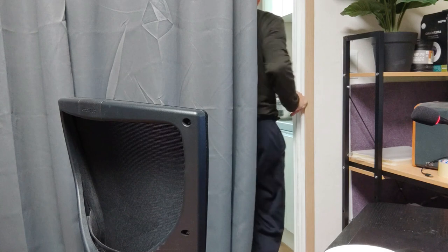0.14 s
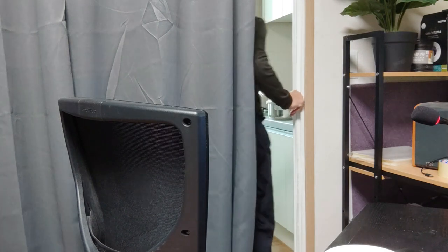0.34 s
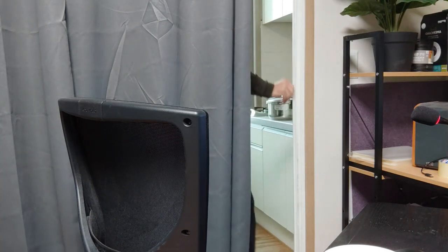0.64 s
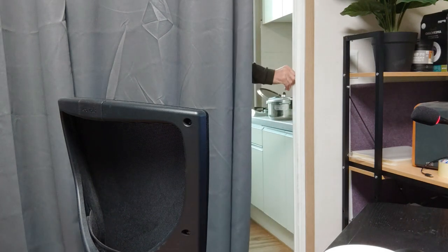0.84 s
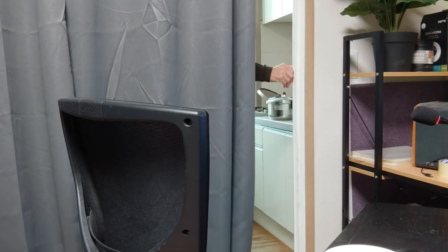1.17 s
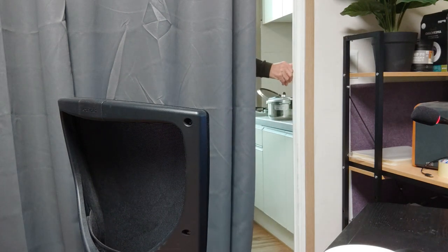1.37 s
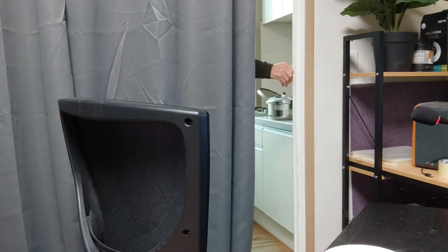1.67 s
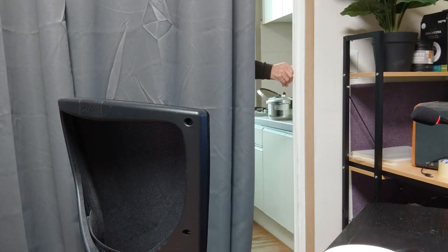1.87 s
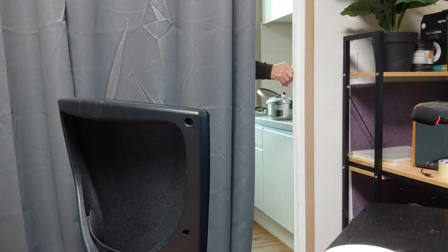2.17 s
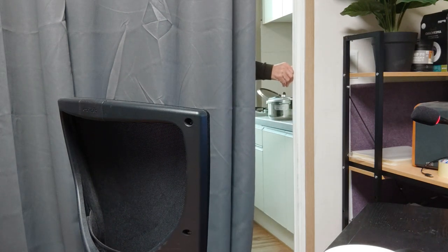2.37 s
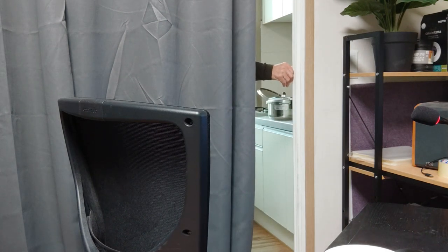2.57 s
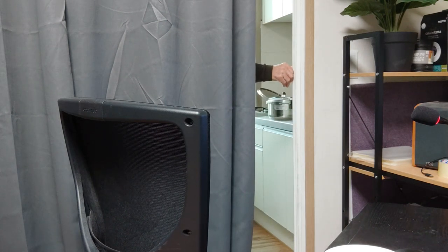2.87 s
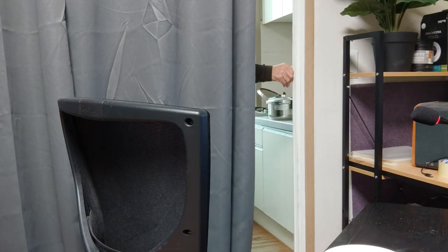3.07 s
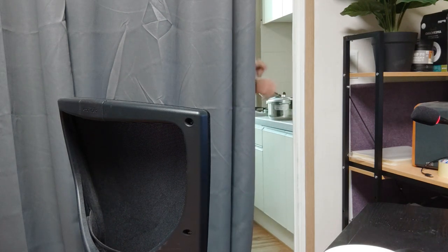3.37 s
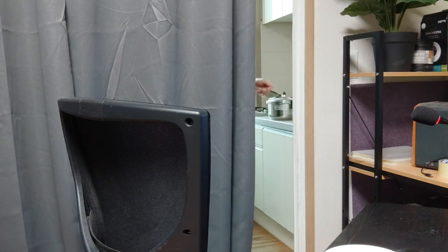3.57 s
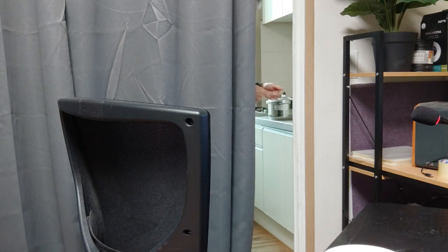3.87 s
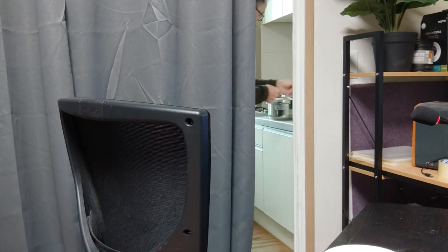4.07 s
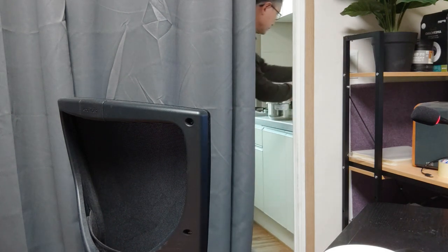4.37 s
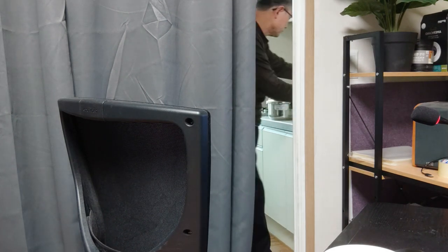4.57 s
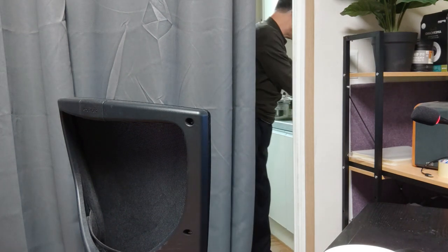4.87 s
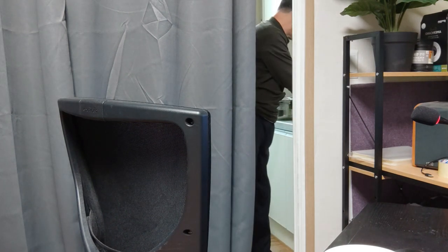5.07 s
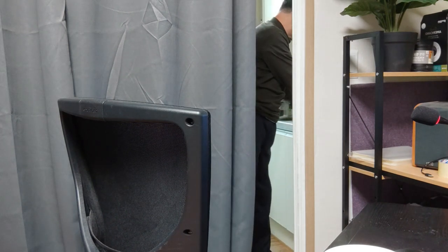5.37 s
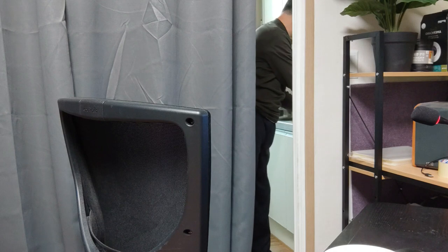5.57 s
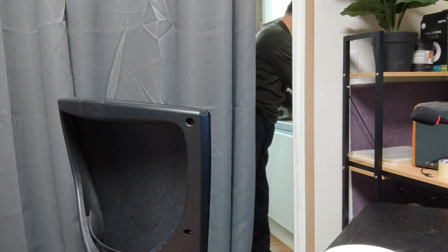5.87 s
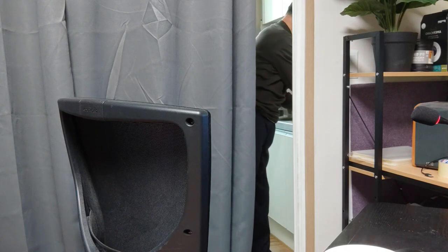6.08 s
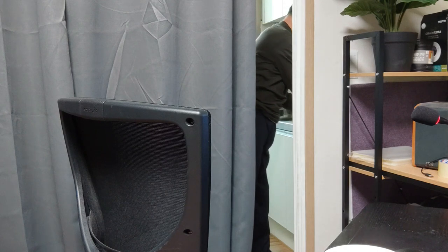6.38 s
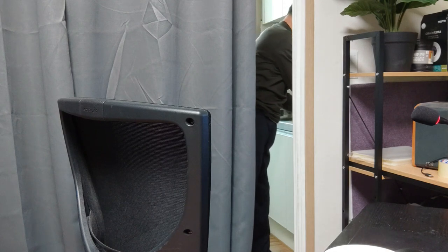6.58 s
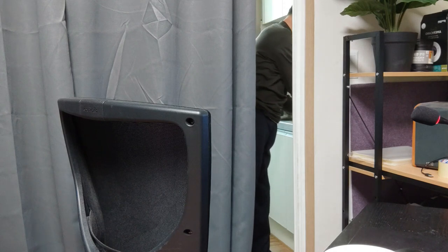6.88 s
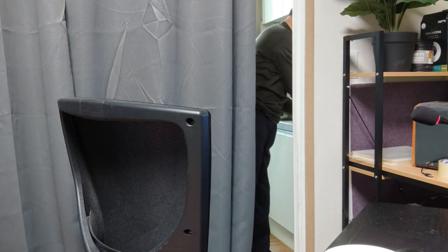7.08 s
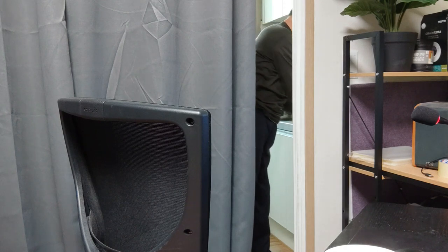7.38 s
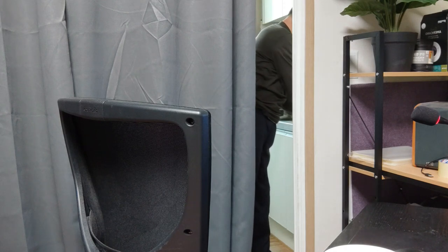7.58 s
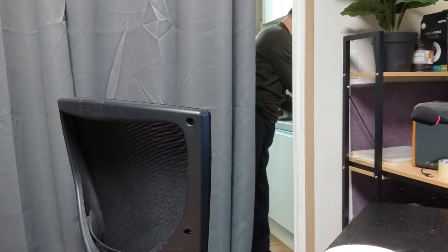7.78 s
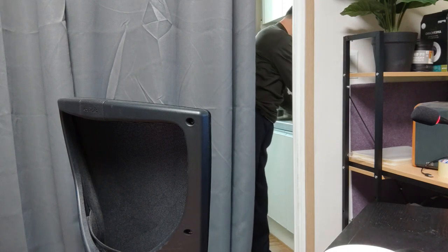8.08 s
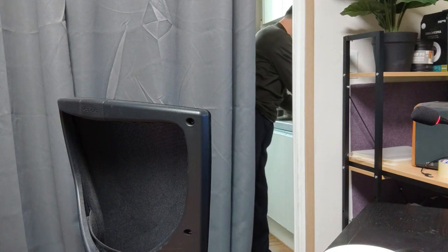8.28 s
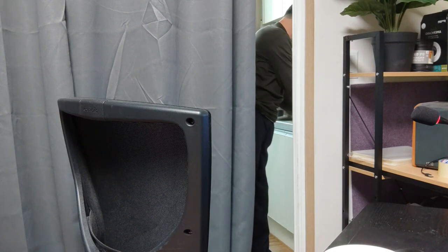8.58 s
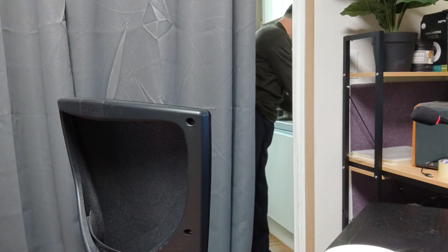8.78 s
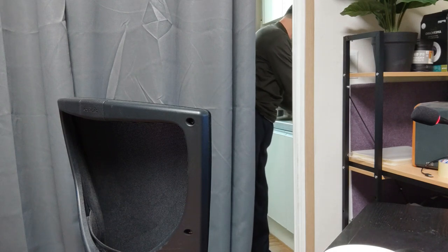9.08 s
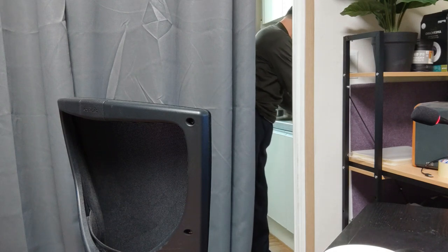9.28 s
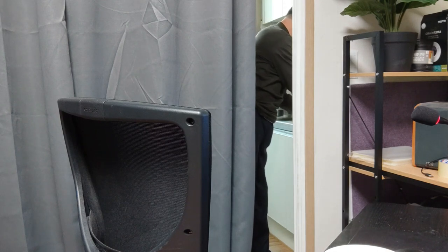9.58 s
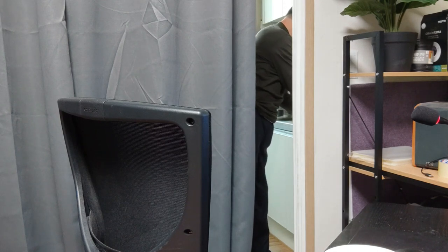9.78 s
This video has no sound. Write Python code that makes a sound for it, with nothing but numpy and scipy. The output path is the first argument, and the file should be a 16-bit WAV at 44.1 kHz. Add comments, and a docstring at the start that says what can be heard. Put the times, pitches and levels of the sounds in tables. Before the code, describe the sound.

A quiet kitchen heard through its doorway from the next room, identical in both ears, with soft air noise, a faint wavering low hum and short room reflections. Sleeves rustle from the start. At 0.43-0.45 s a hard, bright double click snaps, with much weaker ones at 0.6 and 0.68. Faint rubbing and light knocks follow, a pot shifts around 1.9-2.3, and at 2.48 a steel lid clacks onto it with a brief damped ring. Rustle and small ticks come at 3.2-3.4, then scattered knocks from 4.1 to 4.8 and a quick cloth rub near 4.96. At 5.07 the tap opens, swelling fast into a bright aerated fizz, drumming on a steel basin from 5.2 with gurgling drain. Splashy rinsing occurs at 5.8-6.9; the jet then runs steadily, with a soft basin bump at 8.4. Stronger rinsing splashes start at 9.16, water continuing to the end.

```python
"""A kitchen, heard through its doorway by a microphone in the next room. An appliance hums in the still air
and clothes rub. Hard clicks snap near the door frame, then bursts of micro-impacts knock cookware and set
a lid ringing on its pot. The tap opens: bubbles ringing for a few cycles make the fizz, splatter and drain
gurgle of an aerated jet, which drums on the modes of a steel sink; twice something is rinsed in it."""
import sys
import numpy as np
from scipy import signal
from scipy.fft import rfft, irfft
from scipy.io import wavfile
from scipy.ndimage import uniform_filter1d

SR = 44100
rng = np.random.default_rng(int(sys.argv[2]) if len(sys.argv) > 2 else 0)


def transcribe(signal):
    """Save signal, clipped to [-1, 1], as a 16-bit WAV file at the path in sys.argv[1]."""
    frames = np.atleast_2d(signal).T
    limited = np.clip(frames, -1, 1)
    pcm = np.round(limited * 32767).astype(np.int16)
    wavfile.write(sys.argv[1], SR, pcm)


N = 437913
T = np.arange(N) / SR
# Levels in the tables are those of the source, before its own mix gains and the room.


def undb(db):
    """Decibels to gain."""
    return 10 ** (np.asarray(db) / 20)


def unit(x):
    """Scale to rms 1."""
    return x / np.sqrt(np.mean(x ** 2))


def swell(rows):
    """Gain along a curve of (s, dB) rows."""
    s, db = np.transpose(rows)
    return undb(np.interp(T, s, db))


def ramp(start, length):
    """0 before the start, rising straight to 1 over the length."""
    return np.clip((T - start) / length, 0, 1)


def humps(rows):
    """Gain of smooth rises and falls, one for each (middle s, dB, half length s) row; their powers add."""
    power = sum(undb(db) ** 2 * np.exp(-((T - s) / length) ** 2) for s, db, length in rows)
    return np.sqrt(power)


def walk(rate):
    """Slow chance: random levels around 0, drawn at the rate in Hz, held and slewed twice; rms 1."""
    k = int(SR / rate)
    held = np.repeat(rng.standard_normal(N // k + 1), k)
    slewed = uniform_filter1d(uniform_filter1d(held, k), k)
    return unit(slewed[:N])


def through(x, response):
    """Pass a sound through an impulse response."""
    return signal.oaconvolve(x, response)[:N]


def colour(points, size=8192):
    """Causal (minimum-phase) impulse response of unit energy, its spectrum shaped by (Hz, dB) points."""
    hz, db = np.transpose(points)
    bins = np.maximum(np.fft.rfftfreq(size, 1 / SR), 1)
    magnitude = undb(np.interp(np.log(bins), np.log(hz), db))
    cepstrum = irfft(np.log(magnitude))
    # folding the cepstrum forward in time makes the response causal
    cepstrum[1:size // 2] *= 2
    cepstrum[size // 2 + 1:] = 0
    response = irfft(np.exp(rfft(cepstrum)))
    return response / np.linalg.norm(response)


def ring(modes):
    """Impulse response of unit energy from decaying (Hz, energy dB, t60 s) modes."""
    t = T[:SR]
    response = np.zeros(len(t))
    for hz, db, t60 in modes:
        tone = np.sin(2 * np.pi * hz * t + rng.uniform(0, 2 * np.pi))
        response += undb(db) / np.sqrt(t60) * tone * np.exp(-np.log(1000) * t / t60)
    return response / np.linalg.norm(response)


ROOM_T60_S = 0.29


def room(x, direct_db, tail_db, build_s=0.0036, count=6):
    """Direct sound plus a small hard-walled room's tail; each spot the source moves over has its own echoes."""
    t = T[:SR // 2]
    fade = np.exp(-np.log(1000) * t / ROOM_T60_S) * (1 - np.exp(-t / build_s))
    shares = np.array([walk(rate=120) for _ in range(count)])
    shares = shares / np.linalg.norm(shares, axis=0)
    tail = sum(through(x * share, rng.standard_normal(len(t)) * fade) for share in shares)
    return undb(direct_db) * x + undb(tail_db) * tail / np.linalg.norm(fade)


def grains(rate, spread_db):
    """Randomly timed tiny impulses of uneven size and either sign, rate per second, rms 1."""
    chance = rng.random((int(rate * N / SR), 3))
    when = (chance[:, 0] * N).astype(int)
    size = undb(-spread_db * np.log(1 - .995 * chance[:, 1]))
    sign = np.sign(chance[:, 2] - .5)
    return unit(np.bincount(when, size * sign, N))


def contacts(rows):
    """A fading burst of fine noise for each (s, dB, length s) row; dB is its energy spread over 10 ms."""
    out, t = np.zeros(N + SR), T[:SR // 4]
    for s, db, length in rows:
        burst = rng.standard_normal(len(t)) * np.exp(-t / length)
        start = int(s * SR)
        out[start:start + len(t)] += undb(db) * burst * np.sqrt(SR / 100) / np.linalg.norm(burst)
    return out[:N]


def bubbles(rate, cycles, spread_db, count=56):
    """Bubbles of many sizes, each ringing for a few cycles (the resonator's Q); rms 1."""
    total = np.zeros(N)
    for hz in np.geomspace(180, 16000, count):
        resonator = signal.iirpeak(hz, max(cycles, 2), fs=SR)
        total += signal.lfilter(*resonator, grains(rate / count, spread_db))
    return unit(total)


# Still air of the flat. Each row: frequency in Hz, relative level in dB per Hz.
AIR_COLOUR = [(20, -8.5), (36, 4), (80, 0), (170, -2.5), (330, -5.5), (520, -10.5), (760, -8), (1000, -5.5),
              (1700, -8), (2450, -14.5), (3100, -9.5), (4200, -10.5), (6400, -4.5), (8500, -13),
              (11000, -18), (15000, -22.5)]
# Appliance hum. Each row: frequency in Hz, level in dB relative to the hum curve, rate of wavering in Hz.
HUM = [(57.5, -1.5, 4.5), (121.6, -7.3, 9)]
# Rise and fall of the hum. Each row: time in seconds, level in dB.
HUM_LEVEL = [(0.0, -59.5), (2.38, -56.5), (3.87, -63), (6.72, -55.5), (7.36, -69), (7.44, -59), (8.54, -51),
             (8.77, -62), (8.93, -49), (9.6, -62), (9.79, -50), (9.93, -56)]


def background():
    """Steady air noise, and an appliance's hum as tones wavering in phase and level."""
    air = through(rng.standard_normal(N), colour(AIR_COLOUR)) * undb(-48.5 + 0.48 * walk(2.26))
    hum = np.zeros(N)
    for hz, db, width in HUM:
        tone = np.sin(2 * np.pi * hz * T + .5 * walk(width))
        hum += undb(db) * unit(tone * undb(2 * walk(width)))
    return air + hum * swell(HUM_LEVEL)


# Sleeves and hands rubbing, a stroke for each move of the cook.
# Each row: middle in seconds, level in dB, half length in seconds.
STROKES = [(.13, -44.3, .17), (.55, -44, .25), (.92, -51, .1), (1.17, -48, .14), (1.5, -54, .15),
           (1.94, -50, .07), (2.335, -44.5, .045), (2.85, -50.5, .22), (3.2, -45, .04), (3.32, -43.5, .06),
           (4.45, -53, .5), (4.86, -46, .12), (4.977, -41.5, .016)]
# Colour of the rubbing. Each row: frequency in Hz, relative level in dB.
RUSTLE_COLOUR = [(200, -17.5), (1000, -10.5), (2500, -14.5), (3700, -11), (4800, -3.5), (6300, -1),
                 (7200, -4), (9000, -17), (15000, -33)]


def clothes():
    """Cloth fibres catch and let go in dense small grains."""
    rub = grains(4000, spread_db=5.0) * humps(STROKES) * undb(0.6 * walk(20))
    return room(through(rub, colour(RUSTLE_COLOUR)), direct_db=-5, tail_db=-2.5)


# Sharp snaps by the doorway. Each row: start in seconds, level in dB.
SNAPS = [(0.4297, -28), (0.445, -10.5), (.607, -41), (0.675, -36)]
# Colour of a snap's click. Each row: frequency in Hz, relative level in dB.
SNAP_COLOUR = [(80, -15), (450, -15), (1200, -17), (2400, -22), (3400, -1), (4900, 5.5), (7100, 6.5),
               (8500, -9), (10000, -33), (15000, -40)]
# Duller body of a snap, as the door frame spreads it into the room.
# Each row: frequency in Hz, relative level in dB.
FRAME_COLOUR = [(60, -13), (170, 12), (280, -8), (520, 2), (1100, -9), (1900, -6), (2700, -2.5), (4000, -3),
                (5500, 6.5), (8000, -6), (12000, -25)]


def snaps(rebound_s=.00052, rebound_db=-4, frame_s=.0025, frame_db=-9):
    """Hard clicks that rebound at once, reflect off the door frame and shake it."""
    push = np.zeros(N)
    for s, db in SNAPS:
        for lag, gain in [(0, 1), (rebound_s, -undb(rebound_db)), (frame_s, undb(frame_db))]:
            # level as energy spread over 10 ms
            push[int(s * SR) + int(lag * SR)] += gain * undb(db) * np.sqrt(SR / 100)
    click = room(through(push, colour(SNAP_COLOUR)), direct_db=-10.5, tail_db=-18.5)
    body = through(contacts([(s, db, .03) for s, db in SNAPS]), colour(FRAME_COLOUR))
    return click + room(body, direct_db=-16.5, tail_db=-18.5)


# Light knocks of utensils on the worktop, and at 4.961 s a quick bright rub of cloth.
# Each row: start in seconds, level in dB, fade in seconds, lowest frequency in Hz,
# dull low part in dB relative to the row's level.
TOUCHES = [(1.535, -35.5, .02, 4030, -15), (2.108, -40.5, 0.0089, 2200, -2), (2.143, -41, .008, 3000, 2),
           (2.159, -30, 0.013, 4000, -6), (2.275, -39, 0.024, 3500, -0.5),
           (3.321, -35.5, 0.0033, 3000, -26), (3.355, -44, .006, 2500, -14),
           (4.108, -40.5, 0.006, 2500, -6), (4.254, -31.8, 0.003, 2000, -16), (4.498, -30, 0.02, 5600, -15),
           (4.558, -29.5, 0.034, 4000, -12.5), (4.605, -42, 0.0072, 1500, -9),
           (4.774, -36.5, 0.0097, 4500, -23), (4.816, -39, .002, 4500, -24),
           (4.961, -30.5, 0.015, 6500, -35)]
# Bright colour of these touches and of the lid's clack. Each row: frequency in Hz, relative level in dB.
TOUCH_COLOUR = [(150, -17), (1200, -13), (2400, -5), (3800, -4), (6000, 1), (7200, -1), (9000, -11.5),
                (12000, -26), (15000, -35)]
# A pot shifted on its stand in short shoves. Each row: middle in seconds, level in dB, half length in seconds.
SHOVES = [(1.935, -46, .06), (2.19, -49.5, .045), (2.3, -48.5, .03)]
# Colour of the sliding pot and the dull low parts. Each row: frequency in Hz, relative level in dB.
SLIDE_COLOUR = [(150, -14), (450, 0.5), (620, 1.5), (750, -4), (920, -1), (1300, -10.5), (1850, -2.5),
                (2400, -11), (4000, -8.5), (9000, -37)]
# A steel lid set down on its pot. Each row: start in seconds, level in dB, contact fade in seconds.
LID_BLOWS = [(2.478, -24, 0.0044), (2.482, -17, 0.0073), (2.501, -28, 0.015), (2.533, -29.5, .015)]
# The lid's resonances, damped by the hand. Each row: frequency in Hz, energy in dB, t60 in seconds.
LID_MODES = [(893, -7, 0.066), (993, -1.5, .07), (1810, -3, 0.081), (2060, 1, 0.07), (2200, -2, 0.078),
             (3020, 1, .03), (3600, -1.5, 0.018), (4300, -1, 0.019), (5230, 6, 0.013), (6030, 5, .025),
             (6480, 9, .015), (7400, 11, 0.013), (8830, 2.5, 0.0082), (9500, -2, 0.013),
             (11000, -7, 0.0089)]


def cookware():
    """Noise bursts for knocking utensils and one rub of cloth, grains for a sliding pot, modes for its lid."""
    touches = np.zeros(N)
    for s, db, length, lowest_hz, _ in TOUCHES:
        # smaller objects have no low resonances
        highpass = signal.butter(2, lowest_hz, "high", fs=SR, output="sos")
        touches += signal.sosfilt(highpass, contacts([(s, db, length)]))
    bright = undb(1.5) * through(touches, colour(TOUCH_COLOUR))
    dull = contacts([(s, db + dull_db, length) for s, db, length, _, dull_db in TOUCHES])
    slide = grains(400, spread_db=2) * humps(SHOVES)
    low = through(dull + slide, colour(SLIDE_COLOUR))
    lid_ring = undb(-3.5) * through(contacts(LID_BLOWS), ring(LID_MODES))
    lid_clack = undb(-5.0) * through(contacts(LID_BLOWS), colour(TOUCH_COLOUR))
    return room(bright + low + lid_ring + lid_clack, direct_db=-7.5, tail_db=-4.5)


# The fizz starts this far under its full level and closes the gap; the jet lands a moment later.
TAP_OPENS_S, OPENING_DB, OPENING_S, JET_LANDS_S = 5.07, -19.5, .14, 5.205


def flow():
    """Strength of the jet, 0-1: it grows quickly as the tap opens, then holds."""
    since_open = np.maximum(T - TAP_OPENS_S, 0)
    return ramp(TAP_OPENS_S - .03, .03) * undb(OPENING_DB * np.exp(-since_open / OPENING_S))


# Something is rinsed in the jet. Each row: start in seconds, end in seconds.
RINSES = [(5.78, 6.88), (9.16, 10.1)]
# Rinsing gives more fizz, less splatter and more run-off; the change takes a moment.
RINSE_FIZZ_DB, RINSE_SPLATTER_DB, RINSE_DRAIN_DB, RINSE_FADE_S = 0.9, -1.2, 7, .05


def rinsing():
    """1 while something is held in the jet, 0 while it falls freely."""
    return sum(ramp(start, RINSE_FADE_S) - ramp(end, RINSE_FADE_S) for start, end in RINSES)


# Spurts where the jet is deflected. Each row: start in seconds, level in dB, fade in seconds.
SPLASHES = [(5.211, -14.3, .02), (5.476, -16, .08), (5.845, -13.3, .04), (5.99, -18, .02),
            (6.11, -17.5, .02), (6.283, -15.5, .03), (6.42, -17, .015), (6.508, -12, .05),
            (6.792, -16, .008), (7.958, -18, .008), (8.429, -13, .018), (8.695, -15.5, 0.0073),
            (9.195, -15.5, 0.016), (9.32, -18, .02), (9.445, -12.5, .025), (9.573, -11, 0.012),
            (9.695, -9.5, 0.019), (9.825, -14, 0.008)]
# Colour of the fine bubbles. Each row: frequency in Hz, relative level in dB.
FIZZ_COLOUR = [(1000, -40), (3000, -25), (3550, -19.5), (4000, -10.5), (4500, -9.5), (5400, -3.5),
               (6500, -1), (7350, -2), (8200, -7), (10000, -13), (12500, -20.5), (15000, -25.5)]
# Colour of the coarse splatter. Each row: frequency in Hz, relative level in dB.
SPLATTER_COLOUR = [(150, -12), (700, -20.5), (1100, -6.5), (1450, -9), (1700, -1), (2300, 1), (2900, -2),
                   (4000, 3.5), (7000, -27)]
FIZZ_DB, SPLATTER_DB = -25.25, -42.7  # the free jet, before colour and room


def water():
    """The aerated jet bursts into fine bubbles and coarser splatter, with spurts where it is deflected."""
    jet, held = flow(), rinsing()
    fizz_gain = jet * undb(FIZZ_DB + RINSE_FIZZ_DB * held)
    fizz = bubbles(rate=24000, cycles=6.6, spread_db=3.5) * fizz_gain
    spurts = undb(-5.0) * contacts(SPLASHES)
    splatter_gain = jet * undb(SPLATTER_DB + RINSE_SPLATTER_DB * held + 0.79 * walk(16))
    splatter = bubbles(rate=8000, cycles=9.7, spread_db=2.5) * splatter_gain
    fine = through(fizz + spurts, colour(FIZZ_COLOUR))
    coarse = undb(1.5) * through(splatter, colour(SPLATTER_COLOUR))
    flutter = undb(0.29 * walk(35))
    return room((fine + coarse) * flutter, direct_db=-7, tail_db=-3.0)


# Gulps of water landing on the sink floor. Each row: middle in seconds, level in dB, half length in seconds.
GULPS = [(5.24, -42.5, .028), (5.395, -42, 0.043), (5.612, -41, .028), (5.785, -38, .035),
         (6.02, -40.5, .042), (6.26, -39, .05), (8.39, -44.5, .09), (8.6, -46, .06), (9.0, -44.5, .06),
         (9.23, -44, 0.066), (9.48, -41.5, 0.027)]
# Soft bumps against the basin. Each row: start in seconds, level in dB, pitch in Hz.
BUMPS = [(5.235, -40.5, 84), (8.385, -33, 128.6), (8.41, -44, 106)]
# Resonances of the steel basin. Each row: frequency in Hz, energy in dB, t60 in seconds.
BASIN_MODES = [(88, -8, 0.51), (133.5, -11.5, 0.3), (171.6, -13.5, 0.24), (214, -11.5, 0.21),
               (240, -7.5, 0.38), (299.1, -0.5, 0.29), (317, -2, 0.32), (339, -3, 0.44),
               (356.4, -0.5, 0.23), (397.8, -3, 0.22), (437, -5.5, 0.32), (485, -17, 0.17),
               (505, -17.5, .25), (543.7, -11.5, 0.42), (640, -17.5, 0.082), (894, -12.5, 0.13)]
# The steady drumming starts weaker and builds up to its full level.
DRUM_DB, DRUM_START_DB, DRUM_BUILD_S = -46.3, -7, 1.8


def basin(wobble_db=1.1):
    """Drops drum the thin steel floor into its modes, steadily and in gulps; soft bumps boom in the bowl."""
    build_db = DRUM_START_DB * (1 - ramp(JET_LANDS_S, DRUM_BUILD_S))
    steady = ramp(JET_LANDS_S, .02) * undb(DRUM_DB + build_db + wobble_db * walk(26))
    drops = unit(through(grains(1500, spread_db=2.0), ring(BASIN_MODES)))
    drum = drops * np.hypot(steady, humps(GULPS))
    for s, db, hz in BUMPS:
        t = np.maximum(T - s, 0)
        envelope = (1 - np.exp(-t / 0.019)) * np.exp(-t / 0.071)
        drum += undb(db) * np.sin(2 * np.pi * hz * t) * envelope
    return drum


# Colour of the draining water. Each row: frequency in Hz, relative level in dB.
GURGLE_COLOUR = [(120, -10), (200, 2), (420, -1.5), (540, 3.5), (640, 2.5), (780, -7.5), (910, 5.5),
                 (1050, -4.5), (1300, -1), (1800, -13.5), (3000, -18.5)]
DRAIN_DB = -58  # under the free jet, before the room
# Each spurt runs off into the drain: level relative to the spurt's table level, delay, half length.
RUNOFF_DB, RUNOFF_LAG_S, RUNOFF_S = -42, .02, .035


def drain(wobble_db=1.4):
    """Bubbles gurgle where the water gathers and runs away, more while rinsing and after each spurt."""
    gurgle = unit(through(bubbles(rate=2500, cycles=13.3, spread_db=3), colour(GURGLE_COLOUR)))
    steady = ramp(JET_LANDS_S, 0.057) * undb(DRAIN_DB + wobble_db * walk(14))
    runoff = humps([(s + RUNOFF_LAG_S, db + RUNOFF_DB, RUNOFF_S) for s, db, _ in SPLASHES])
    gain = np.hypot(steady, runoff) * undb(RINSE_DRAIN_DB * rinsing())
    return room(gurgle * gain, direct_db=-2.5, tail_db=-2)


def scene():
    """Everything arrives through one doorway, the same in both ears."""
    mono = background() + clothes() + snaps() + cookware() + water() + basin() + drain()
    return np.array([mono, mono])


TOP_HZ = 15200


def record(dry):
    """The recorder cuts the top with a steep low-pass."""
    return signal.sosfilt(signal.ellip(8, .2, 70, TOP_HZ, fs=SR, output="sos"), dry)


dry = scene()
out = record(dry)
transcribe(out)
```